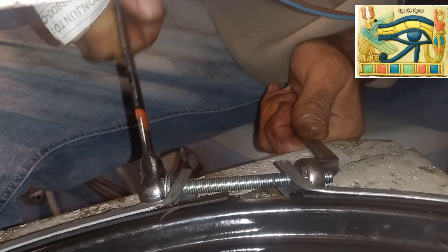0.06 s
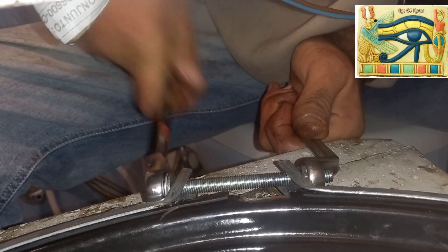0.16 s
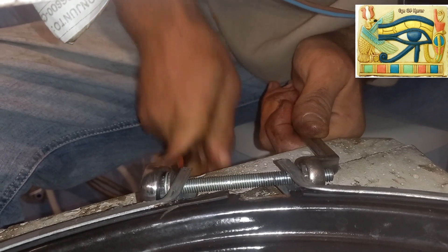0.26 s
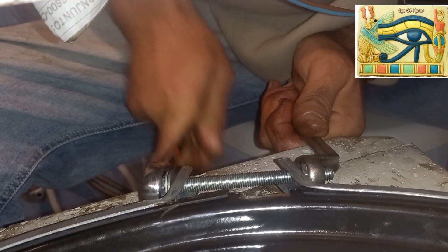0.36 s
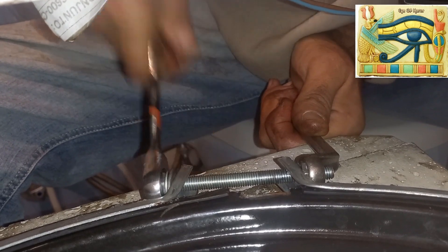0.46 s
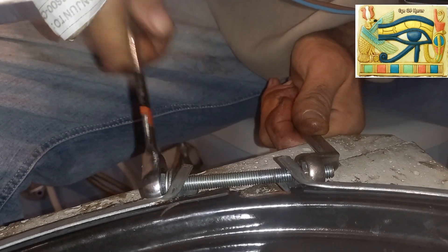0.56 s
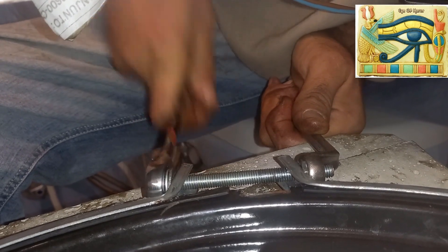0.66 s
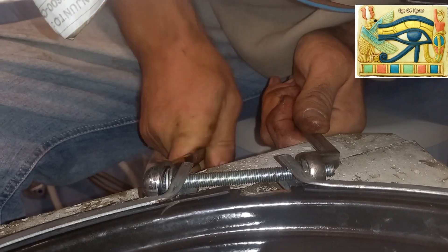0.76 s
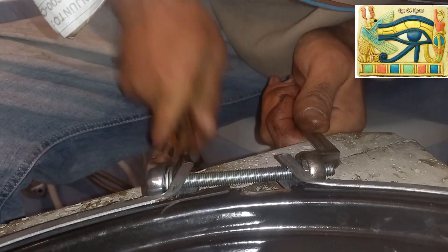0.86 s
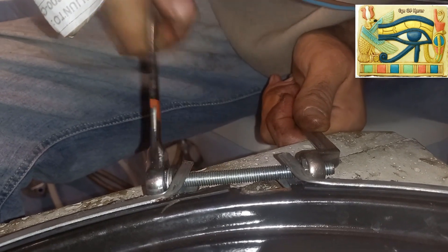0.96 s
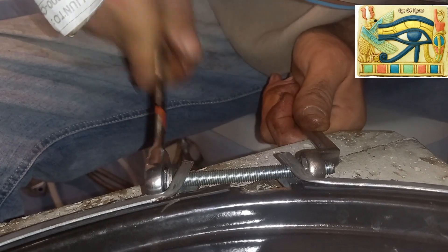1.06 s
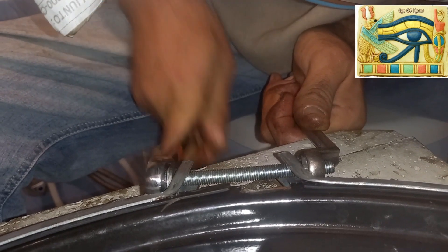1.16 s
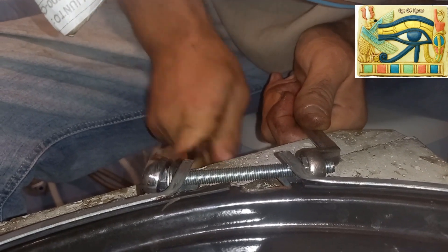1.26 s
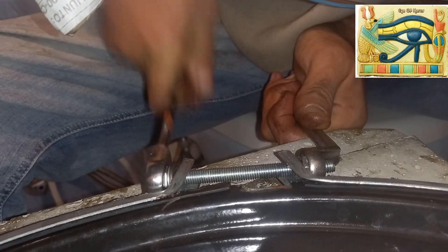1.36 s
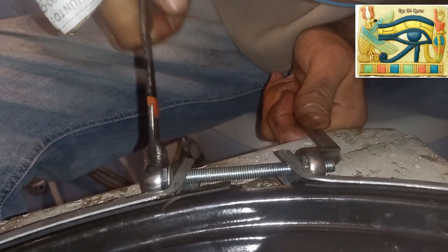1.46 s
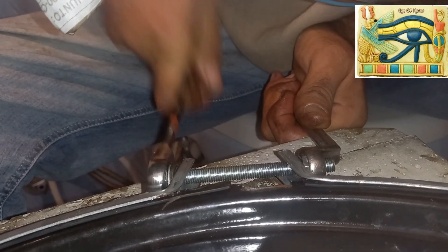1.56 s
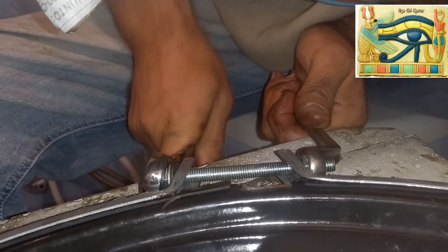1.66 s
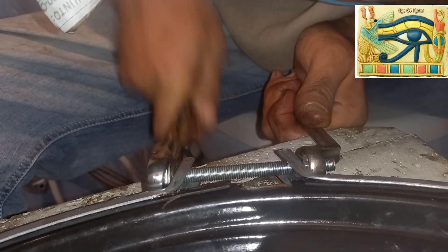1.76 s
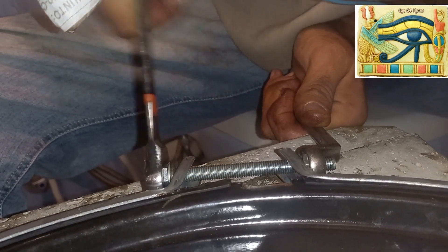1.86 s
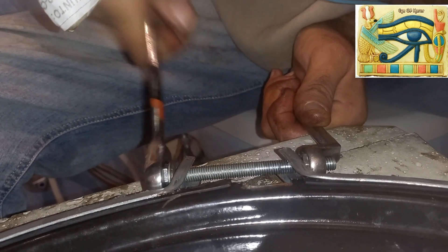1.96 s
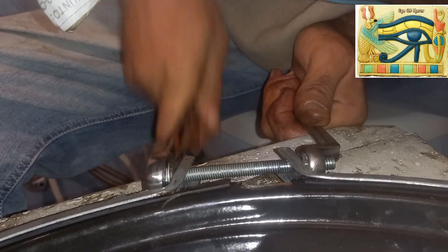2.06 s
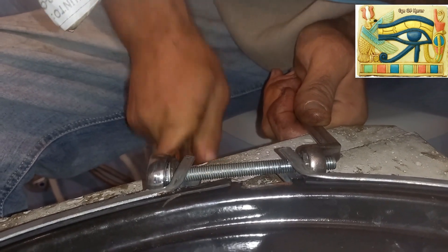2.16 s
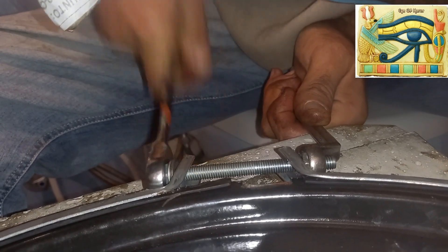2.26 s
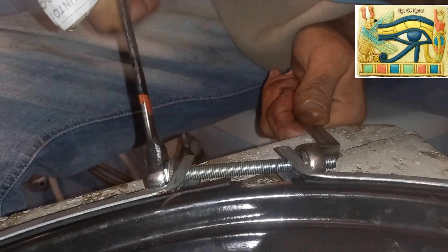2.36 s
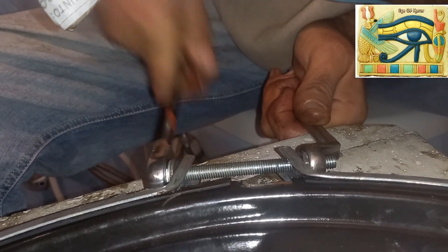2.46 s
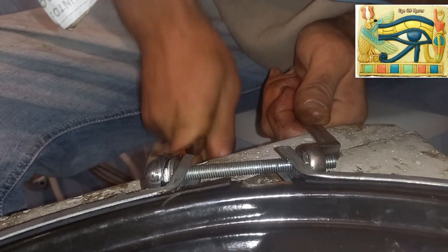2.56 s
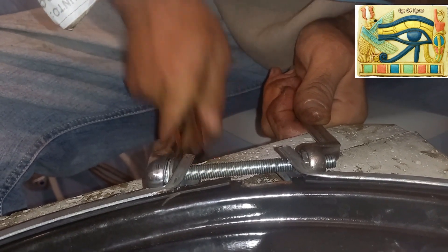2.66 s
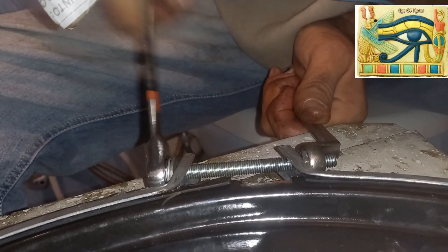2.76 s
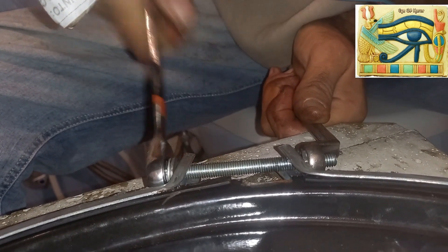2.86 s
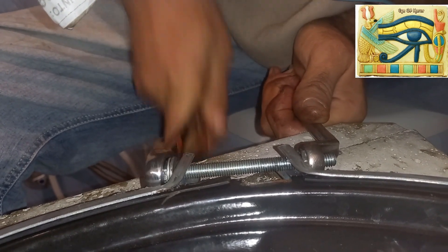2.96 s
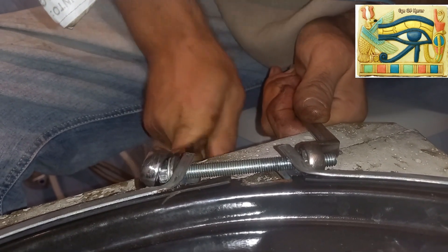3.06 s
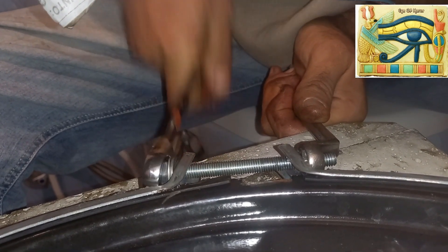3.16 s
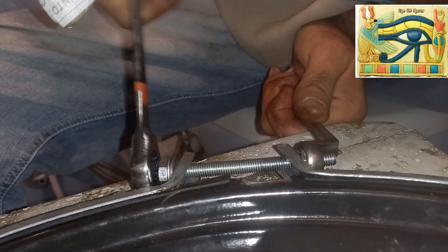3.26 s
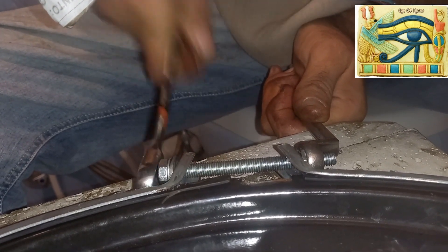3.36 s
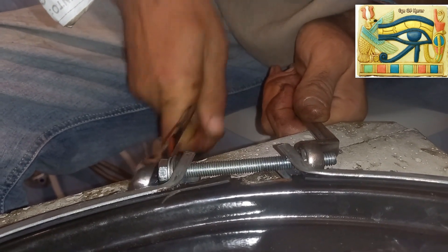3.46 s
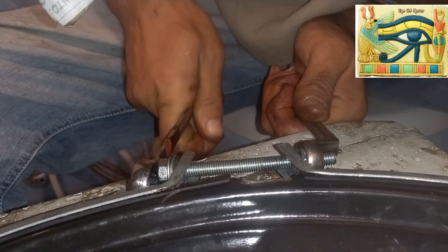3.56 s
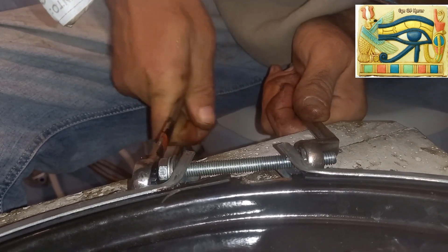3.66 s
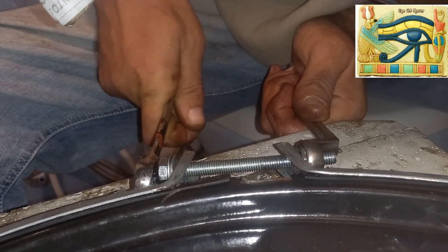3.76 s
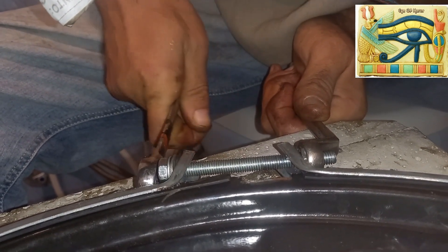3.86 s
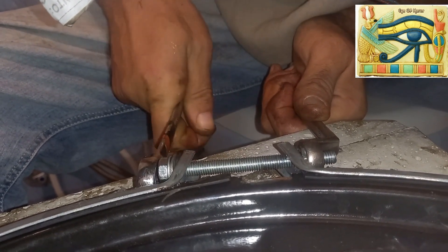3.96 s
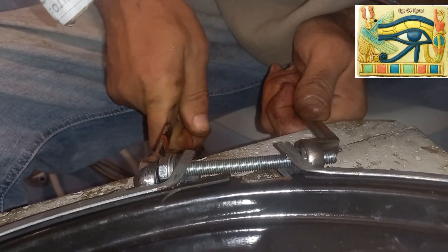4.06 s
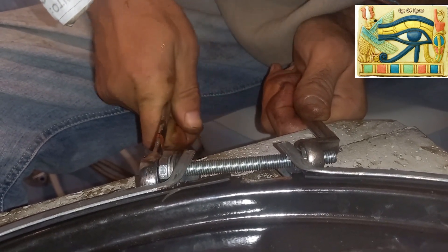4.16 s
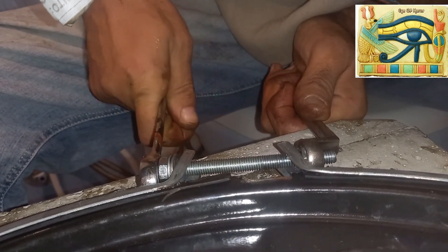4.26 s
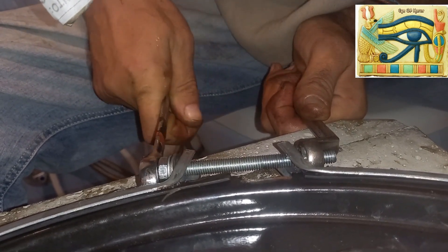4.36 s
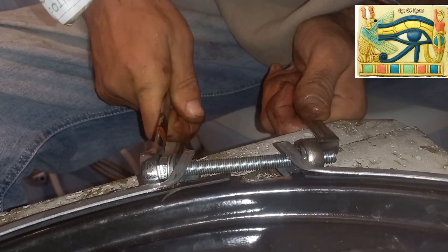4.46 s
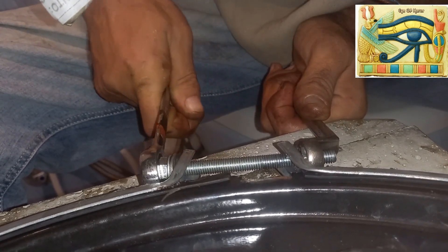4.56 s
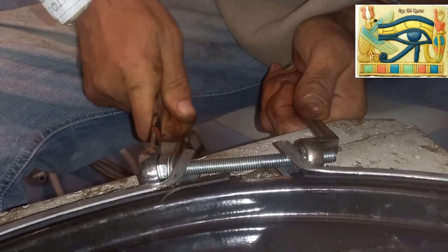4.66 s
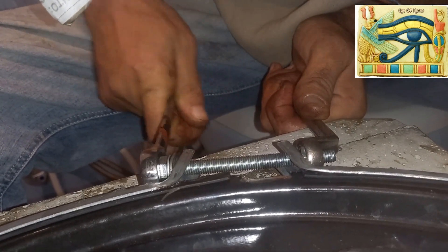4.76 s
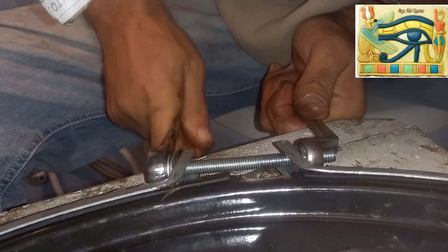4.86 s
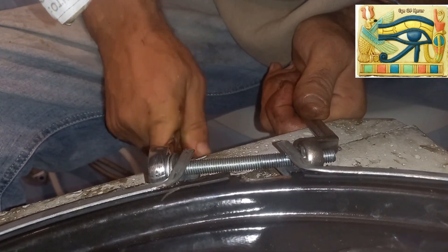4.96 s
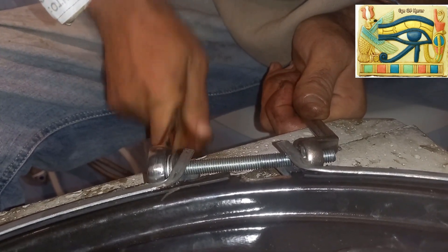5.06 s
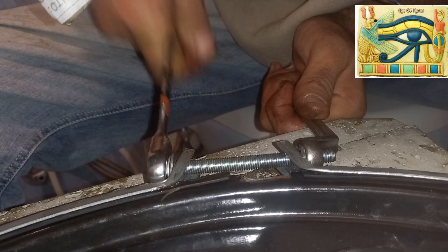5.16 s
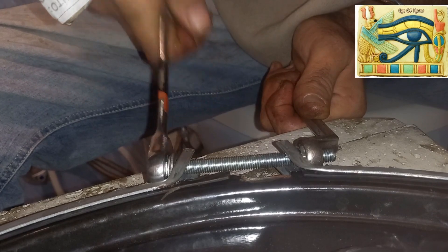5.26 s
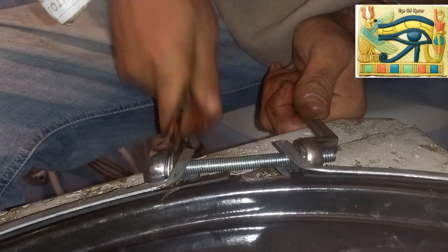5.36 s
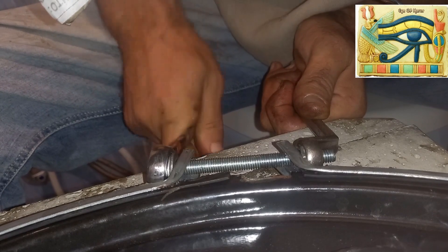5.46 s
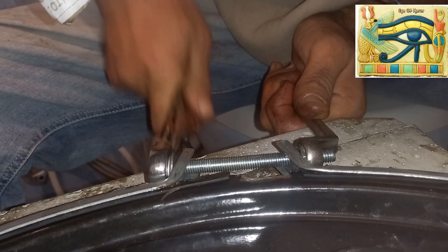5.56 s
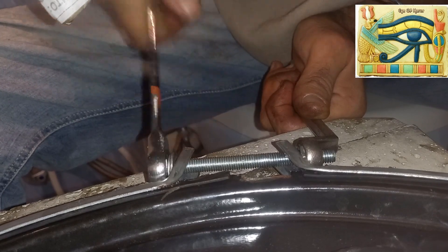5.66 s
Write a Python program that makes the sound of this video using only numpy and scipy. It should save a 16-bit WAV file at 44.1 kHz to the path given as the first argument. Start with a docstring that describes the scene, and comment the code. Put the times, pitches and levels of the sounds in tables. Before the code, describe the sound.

A ratchet wrench works on a clamp around a steel washing machine tub in a small workshop, heard very close in stereo. Fast bright click runs of about 12 to 14 teeth, each around 0.15 s, start at 0.1, 0.6, 1.05, 1.5, 1.95, 2.4 and 2.85 s; the first is slightly longer and slows toward its end. Between runs, duller metallic knocks and gritty rubbing ring the tub briefly, with low rumbles as it rocks, notably near 1.9 s. From 3.0 to 3.5 s there is a cluster of heavier, harder clanks, the strongest near 3.25 and 3.48 s. Then it is sparse: a clunk at 3.87 s, near quiet with faint air, a double knock around 4.45 s, and small taps to 4.86 s. Soft handling leads to a last nine-click run at 5.3 s, a knock at 5.43 s, and light contact at the end. Short room reflections follow.

```python
"""Small workshop: a ratchet wrench turns a nut on a threaded rod clamped over a steel washing machine tub.
Back strokes snap the pawl over 9 to 14 teeth; wrench and hand also knock and rub on the clamp: noise bursts
and grains that ring the tub as decaying sines and stir banded noise for dense small modes and wall returns.
A low filtered-noise rumble swells as the tub rocks, over quiet air. Two microphones close by hear the rim
from different sides; the treble falls steeply near 16 kHz, with nothing above 17 kHz."""
import sys
import numpy as np
from scipy import signal
from scipy.fft import rfft, irfft
from scipy.io import wavfile
from scipy.ndimage import uniform_filter1d

SR = 44100
rng = np.random.default_rng(int(sys.argv[2]) if len(sys.argv) > 2 else 0)


def store_pcm(level_fs):
    """Save levels as 16-bit WAV."""
    pcm = np.round(np.clip(level_fs, -1, 1) * 32767).astype(np.int16)
    wavfile.write(sys.argv[1], SR, np.atleast_2d(pcm).T)


N = 251370

# All table levels are relative; the functions add offsets.
# hand and handle dragging on the clamp: t/s, level/dB
RUB = [(0., -51), (.3, -82.5), (.5, -59), (.75, -42), (1., -59.5), (1.2, -49.5), (1.47, -58.5),
       (1.8, -51.5), (2.3, -45.5), (2.6, -38.5), (2.78, -52), (3.13, -49), (3.4, -37.5), (3.75, -69),
       (4.201, -79), (4.4, -87), (4.47, -68), (4.87, -54), (4.98, -63), (5.2, -57.5), (5.7, -55)]
# tub rocking on its base: t/s, rumble level/dB, t60/s
ROCKS = [(0., -44.5, .15), (.15, -28.5, .2), (.36, -46, .2), (.6, -61, .2), (.76, -27.5, .3),
         (1.05, -37.5, .3), (1.2, -40, .3), (1.52, -51, .3), (1.66, -40.5, .3), (1.865, -19.5, 0.29),
         (1.94, -32.5, 0.21), (2.22, -30.5, .4), (2.409, -31, .2), (2.57, -34.5, .3), (2.801, -36, .15),
         (3.08, -32, .2), (3.25, -33.5, .3), (3.48, -41.5, .4), (3.87, -57.5, .4), (4.461, -49, .2),
         (4.841, -45.5, .4), (5.12, -38, .2), (5.28, -35, .3), (5.55, -41, .3)]
# wrench and hand knocking the clamp: t/s, ring/dB; then re ring: weight/dB, crack/dB, brightness/dB
KNOCKS = [(0.027, -46, 6.5, -15, -25), (0.077, -38, -18, -11, -20.5), (0.105, -32, -27.5, -21, -17),
          (0.3343, -35, -1, -20, -23), (0.3572, -27.5, -2, -6, -28), (0.4177, -55.5, 19.5, -13, -25),
          (0.5344, -32.5, -14, -18, -20), (0.7529, -22.5, -2.5, -2.5, -11), (0.832, -31, 1, -9.5, -38),
          (0.9449, -45, -4, -17, -24), (1.0193, -37, -12.5, -4, -11), (1.2084, -20.5, 4.5, -29, -14),
          (1.289, -32.5, 1, -5, -11.5), (1.3369, -30.5, 0.5, -11, -22), (1.3823, -43, 11.5, -14, -23),
          (1.6702, -21, 0.5, -24, -26), (1.7243, -34, 2.5, -2, -18), (1.7854, -57, 19, -10, -22),
          (1.8774, -46, 17, -20, -15), (2.1188, -22, 7, -9, -6), (2.2196, -18, 0.5, -6.5, -6.5),
          (2.2866, -49, 14, -15, -23), (2.3572, -29, -28, -23, -21.5), (2.597, -24.5, -6, -2.5, 1),
          (2.6947, -43, 11.5, -13, -31), (2.7662, -47.5, 7, -22, -29.5), (2.8064, -39, 1, -31, -30.5),
          (3.0076, -15.5, 1.5, -12, -11.5), (3.0617, -24.5, -3.5, -5.5, -14), (3.0979, -27, 6.5, -21, -14),
          (3.108, -21.5, -3, -6.5, -11), (3.2374, -27, 10, -24, -13.5), (3.2507, -14, 1, 4.5, -4.5),
          (3.311, -22, -4, -17.5, -10), (3.3209, -16.5, -4.5, -17, -13), (3.331, -19.5, -8, -11, -16.5),
          (3.358, -26.5, -0.5, -17.5, -20.5), (3.476, -11.5, -3, 4, -7.5), (3.8704, -23, -15.5, -1, -8.5),
          (4.239, -72.5, 6, -22, -32), (4.4513, -26, -16.5, -14.5, -23), (4.4603, -19.5, -8, -7, -17),
          (4.6194, -43.5, 4.5, -12.5, -35.5), (4.7122, -41.5, -5.5, -8, -26.5),
          (4.7369, -40, -0.5, -20, -23), (4.773, -44.5, 1.5, -20, -34.5), (4.8231, -30, -2, -12.5, -30),
          (4.8557, -26.5, -1, -7, -21), (5.0503, -49, 14, -30, -15), (5.0676, -39.5, -6, -22, -21),
          (5.1517, -43.5, 1, -21.5, -12), (5.252, -27, -13, -24, -20), (5.268, -53.5, 2, -9, -1),
          (5.433, -20.5, -27, -0.5, -3.5), (5.5409, -35.5, 4, -33, -28)]
# back strokes: first tooth t/s, last tooth t/s, teeth, slowing/0-1, snap/dB, ring/dB, change over stroke/dB;
# then re ring: body/dB, crack/dB, edge/dB
STROKES = [(0.1142, 0.2945, 13, 0.33, -15, -19, -3.5, -4.5, 3.5, 1),
           (0.5893, 0.7462, 13, 0.12, -17.5, -17.5, -5, -4.5, 1, 0),
           (1.0471, 1.1938, 12, 0.01, -21, -20, -1, -3.5, -0.5, 0.5),
           (1.507, 1.65, 13, 0, -19.5, -22, -2.5, -1.5, 1, -2),
           (1.947, 2.1053, 13, 0.03, -18, -19, -1, -6, 2, 1),
           (2.4085, 2.5554, 14, 0, -16, -19, -5, -3.5, 3.5, 0.5),
           (2.852, 2.991, 13, 0.02, -17.5, -19.5, -1, -8, 0.5, -2),
           (5.3, 5.427, 9, 0.08, -13, -14.5, -9, -1, 0, 1)]
# clear modes of tub and clamp: f/Hz, level/dB, t60/s (before hand damping), left minus right/dB, left lead/rad
TUB_MODES = [(170, -14, .4, 1, 1.5), (228, -20, 1, -15, 3.5), (343.6, -7.5, 0.57, -13.5, 0.45),
             (425, -13.5, 0.73, -8.5, -8), (483, -12.5, 0.77, 1.5, 0.1), (534, -15.5, .35, -2, -8),
             (631.6, -2, 0.41, -3, 0), (720, -8.5, 0.6, 4, -1), (789, -13.5, 0.3, 2, -5),
             (960, -9, 0.6, -4, 8.5), (929, -11, 0.44, -10, -1), (946, 4, 0.05, -12.5, -0.5),
             (1000, -17, 0.052, -10, 2), (1223, 2, .15, -7, -1.5), (1381, -4.5, 0.4, -7, -3),
             (1565, -6.5, 0.095, -8.5, -7.5), (1770, -11, 0.13, -3, -0.5), (1837, -1.5, 0.25, 6.5, -2),
             (1950, 0, 0.16, -3, -1), (2320, -6, 0.22, 2.5, 24), (2150, -7, .12, 6, 3.5),
             (2240, -1, 0.024, 4.5, 3.3), (2750, -27.5, .1, 4, 7.5), (2620, -14.5, 0.05, 7.5, -9.5),
             (3100, -9.5, 0.049, 6.5, -3.5), (3050, 2.5, .12, -7, -1.5), (2970, -11, .12, 16, -19.5)]
# ratchet head modes, same columns
HEAD_MODES = [(5050, -6, .02, 0., 1.5), (11100, -4, .01, 3, 1.), (12500, -3, .01, 3, -1.),
              (13300, -6, .01, 4, 2.)]
# wrench handle modes, rung by the pawl alone, same columns
HANDLE_MODES = [(2050, -13.5, .05, -2, 1.), (2250, -10, .05, 0.5, 3.1)]
# edges of the seven force parts (boom, clank, body, ring, crack, edge, snap): f/Hz
EDGES_HZ = [150, 450, 750, 1300, 2500, 3800, 8000, 19000]
# third-octave centres of the clatter: f/Hz
THIRDS_HZ = 40 * 2 ** (np.arange(2, 27) / 3)
# countless small modes: f/Hz, level/dB
DENSE_DB = [(100, -56.5), (170, -31.5), (339, -5), (380, -7.5), (547, -8), (833, 0), (1600, -1),
            (2210, -4.5), (2480, -8), (6340, -14), (12900, -30), (15600, -18.5), (16500, -17.5)]
# decay of the small modes: f/Hz, t60/s
QUICK_T60 = [(200, .1), (1000, .08), (2200, .08), (3500, .055), (6000, .042), (12000, .032)]
# where the small modes crowd: f/Hz, width/Hz, level/dB
CROWDS = [(232.6, 17, 9), (335.2, 18, 10), (478, 18, 5), (594.3, 117, 4.5), (1037, 66, 7), (1454, 150, 3),
          (2017, 280, 6), (2243, 65, 7), (3230, 100, -6), (4400, 1000, 0.5), (10670, 1200, 2),
          (12200, 2500, 10)]
# decay of the workshop: f/Hz, t60/s
SHOP_T60 = [(100, 0.28), (260, 0.53), (700, 0.32), (1840, 0.24), (4850, 0.24), (12800, 0.21)]
# walls against the direct sound: f/Hz, level/dB
SHOP_DB = [(200, -9), (1000, -11), (3000, -12), (6000, -13), (12000, -14)]
# microphone balance of the clatter and air: f/Hz, left minus right/dB
LEFT_DB = [(60, -8), (110, -0.5), (200, -6.5), (380, -4), (700, -1.5), (1290, -8.5), (2380, -1.5),
           (4400, -1.5), (8120, 5), (15000, -1)]
# quiet air: f/Hz, level/dB
AIR = [(32, -35.5), (55, 2.5), (139, -21), (176, -9), (304, -9), (843, -28.5), (972, -19), (1560, -31),
       (2280, -40.5), (8000, -36.5), (16000, -39)]

AIR_OFFSET_DB, DENSE_OFFSET_DB, TUB_OFFSET_DB, HEAD_OFFSET_DB = -47.5, 16, -14.5, -8
LEFT_LAG_SAMPLES = 15
KNOCK_CONTACT_MS, PAWL_CONTACT_MS = 2.9, 1.6
BODY_PER_WEIGHT, SNAP_PER_EDGE = .27, 1.14  # dB per dB
CLANK_PER_CRACK = .25  # dB per dB; hard knocks lift the clank and spare the boom
FIRST_TOOTH_DB, TOOTH_JITTER_MS = -3, 1.2
SNAP_SCATTER_DB, RING_SCATTER_DB = 2.5, 1.88
COLOUR_SCATTER_DB = 1.5  # every tooth feeds the parts a little differently
BOUNCE_MS, BOUNCE_DB, BOUNCE_DULLING_DB = 5.5, -4, -5.5
ROCK_RISE_S = .015
TREBLE_EDGE_HZ, TREBLE_END_HZ = 15900, 16963


def undb(db):
    """Decibels to gain."""
    return 10 ** (np.asarray(db) / 20)


def along(table, hz):
    """A (Hz, value) table read on a log-frequency axis."""
    f, v = np.transpose(table)
    return np.interp(np.log(hz + 1), np.log(f + 1), v)


def band(x, lo_hz, hi_hz, order=2):
    """Butterworth band-pass."""
    return signal.sosfilt(signal.butter(order, [lo_hz, hi_hz], "band", fs=SR, output="sos"), x)


def walk(rate_hz):
    """Random levels held 1 / rate_hz s and slewed; spread near 1."""
    hold = int(SR / rate_hz)
    steps = np.repeat(rng.standard_normal(N // hold + 1), hold)
    return uniform_filter1d(steps, hold // 2)[:N]


def drag_db():
    """How hard hand and handle drag at each moment."""
    return np.interp(np.arange(N) / SR, *np.transpose(RUB))


def rub():
    """Dense stick-slip grains feeding the seven parts of the tub."""
    ring_db = drag_db() + 4.5 * walk(25)
    grains = rng.standard_normal(N) * (rng.random(N) < .05)
    offsets_db = np.array([-11, -12, -14, -16, -18, -26, -30])
    return grains * undb(ring_db + offsets_db[:, None])


def ringing(modes):
    """Decaying sines as each microphone hears one sharp tap; the hand on the clamp damps long rings."""
    t = np.arange(SR // 2) / SR
    hz, db, t60, left_db, lead = np.transpose(modes)[:, :, None]
    t60 = np.minimum(t60, 5 / np.sqrt(hz))
    ears = []
    for side in (.5, -.5):  # left, right
        decay = undb(db + side * left_db - 60 * t / t60)
        ears.append(np.sum(decay * np.sin(2 * np.pi * hz * t + side * lead), axis=0))
    return np.array(ears)


def tub(force):
    """Clear modes of tub and ratchet head, rung part by part."""
    tap = undb(TUB_OFFSET_DB) * ringing(TUB_MODES) + undb(HEAD_OFFSET_DB) * ringing(HEAD_MODES)
    return sum(signal.fftconvolve(part[None], band(tap, lo, hi))[:, :N]
               for part, lo, hi in zip(force, EDGES_HZ, EDGES_HZ[1:]))


def fade(power, t60):
    """Stored energy that each impact tops up and that drains 60 dB in t60."""
    return signal.lfilter([1], [1, -10 ** (-6 / (t60 * SR))], power)


def crowd(x):
    """Lifts the bands where small modes crowd."""
    hz = np.arange(N // 2 + 1) * SR / N
    lift = .65 + sum(undb(db) / (1 + (2 * (hz - f) / width) ** 2) for f, width, db in CROWDS)
    return irfft(rfft(x) * lift / 2, N)


def clatter(force):
    """Modes too dense to tell apart die quickly; the walls return them later and longer, over quiet air."""
    out = 0
    metal = crowd(rng.standard_normal((2, N)))
    air = rng.standard_normal((2, N))
    for hz in THIRDS_HZ:
        part = np.clip(np.searchsorted(EDGES_HZ, hz) - 1, 0, 6)
        power = force[part] ** 2
        # each band's level wanders at random, so the colour keeps changing
        wandering = power * undb(2 * 1.6 * walk(60))
        # unrelated noise in every band
        metal, air = np.roll(metal, 5000, axis=1), np.roll(air, 5000, axis=1)
        # builds up over the first echoes
        walls = np.maximum(fade(power, along(SHOP_T60, hz)) - fade(power, .04), 0)
        energy = fade(wandering, along(QUICK_T60, hz)) + undb(2 * along(SHOP_DB, hz)) * walls
        metal_gain = undb(along(DENSE_DB, hz) + DENSE_OFFSET_DB) * np.sqrt(energy)
        air_gain = undb(along(AIR, hz) + AIR_OFFSET_DB + 2 * walk(4))
        near, own = metal * metal_gain + air * air_gain
        # the left microphone is further away and shares less of the treble
        apart = hz / (hz + 1500)
        left = np.sqrt(1 - apart) * np.roll(near, LEFT_LAG_SAMPLES) + np.sqrt(apart) * own
        pair = np.array([left, near]) * undb(along(LEFT_DB, hz) * np.array([[.5], [-.5]]))
        out = out + band(pair, hz / 1.164, hz * 1.104)
    return out


def rocking():
    """A low rumble that swells quickly and dies away each time the tub shifts."""
    t = np.arange(N) / SR
    swell = undb(.35 * drag_db() - 37.5 + 1.5 * walk(4.1))  # any drag stirs it a little
    for s, db, t60 in ROCKS:
        since = np.maximum(t - s, 0)
        swell = swell + undb(db - 60 * since / t60) * (1 - np.exp(-since / ROCK_RISE_S))
    mid, side = band(rng.standard_normal((2, N)), 62, 370, order=4)
    pair = mid + .45 * side * np.array([[1], [-1]])
    return swell * undb(11 + np.array([[-1.5], [1.5]])) * pair


def blows(s, parts_db, contact_ms):
    """Each blow is a rattle of tiny impacts that swells and fades over the contact; one force track per part."""
    force = np.zeros((len(parts_db), N))
    t = np.arange(2048) / SR
    along_contact = t * 1000 / contact_ms
    rattle = rng.standard_normal((len(s), len(t)))
    rattle *= along_contact ** .29 * np.exp(-along_contact)
    rattle /= np.sqrt(np.sum(rattle ** 2, axis=1, keepdims=True))
    # the swell begins half a contact ahead of the heard blow
    starts = ((s - contact_ms / 2000) * SR).astype(int)
    for at, db, shape in zip(starts, np.transpose(parts_db), rattle):
        force[:, at:at + len(t)] += undb(db)[:, None] * shape[:N - at]
    return force


def knocks():
    """Duller blows with longer contact; heavy ones reach the low parts, hard ones the high parts."""
    s, ring, weight, crack, edge = np.transpose(KNOCKS)
    parts_db = [ring + weight - CLANK_PER_CRACK * crack - 1.5,
                ring + weight + CLANK_PER_CRACK * crack + 7,
                ring + BODY_PER_WEIGHT * weight + 4,
                ring - 1.5,
                ring + crack + 4,
                ring + edge + 6,
                ring + SNAP_PER_EDGE * edge + 3]
    return blows(s, parts_db, KNOCK_CONTACT_MS)


def pawl():
    """Short, bright snaps as the handle swings back and slows; the pawl lands twice, the second time duller."""
    rows = []
    chance = rng.standard_normal((len(STROKES), 20, 10))
    for stroke, luck in zip(STROKES, chance):
        first, last, teeth, slowing, snap_db, ring_db, change_db, body, crack, edge = stroke
        way = np.linspace(0, 1, round(teeth))
        late, snap_luck, ring_luck, *colour = luck[:len(way)].T * (way > 0)
        s = first + (last - first) * ((1 - slowing) * way + slowing * way ** 4)
        s = s + late * (way < 1) * TOOTH_JITTER_MS / 1000  # first and last teeth stay put
        trend = change_db * way + FIRST_TOOTH_DB * (way == 0)
        snap = snap_db + trend + SNAP_SCATTER_DB * snap_luck
        ring = ring_db + trend + RING_SCATTER_DB * ring_luck
        parts = [ring + body - 2, ring + body - 4, ring + body, ring - 4,
                 ring + crack, ring + edge, snap + 5]
        rows.append([s, *(parts + COLOUR_SCATTER_DB * np.array(colour))])
    s, *parts_db = np.concatenate(rows, axis=1)
    dulling_db = BOUNCE_DULLING_DB * np.linspace(0, 1, len(parts_db))[:, None] ** 4
    bounce_db = np.array(parts_db) + BOUNCE_DB + dulling_db
    s = np.append(s, s + BOUNCE_MS / 1000)
    return blows(s, np.append(parts_db, bounce_db, axis=1), PAWL_CONTACT_MS)


def handle(teeth):
    """Wrench handle modes rung by the ring part of the pawl force."""
    return signal.fftconvolve(teeth[3:4], ringing(HANDLE_MODES))[:, :N]


def scene():
    """All forces ring the tub and stir the clatter; the pawl also rings its own handle."""
    teeth = pawl()
    force = teeth + knocks() + rub()
    return tub(force) + clatter(force) + handle(teeth) + rocking()


def record(dry):
    """Rounds the loudest peaks; treble falls steeply near 16 kHz, nothing above 17 kHz."""
    rounded = 1.15 * np.tanh(dry / 1.15)
    dull = signal.sosfilt(signal.ellip(6, .3, 32, TREBLE_EDGE_HZ, fs=SR, output="sos"), rounded)
    return signal.sosfilt(signal.ellip(10, .2, 90, TREBLE_END_HZ, fs=SR, output="sos"), dull)


dry = scene()
out = record(dry)
store_pcm(out)
```